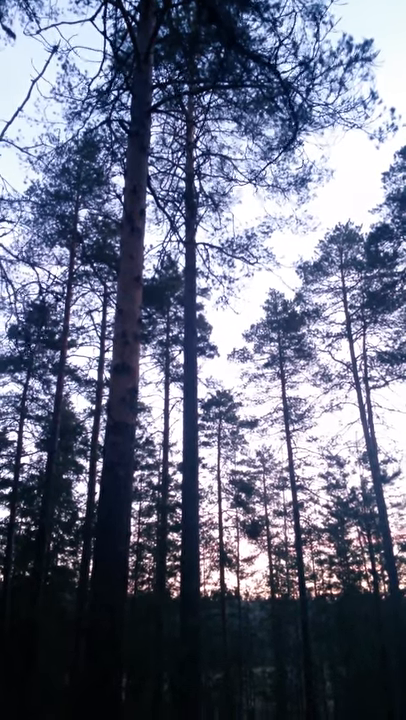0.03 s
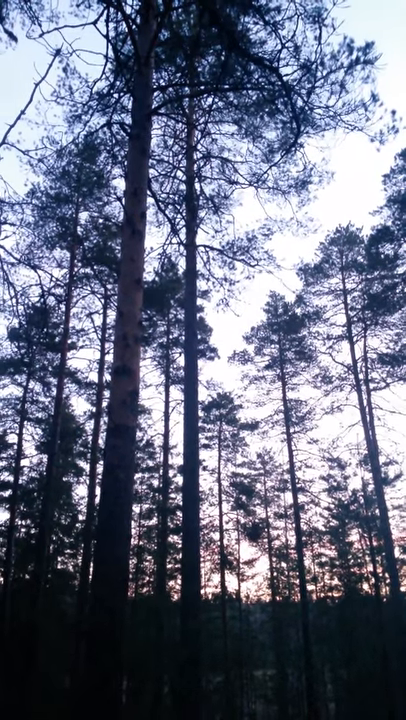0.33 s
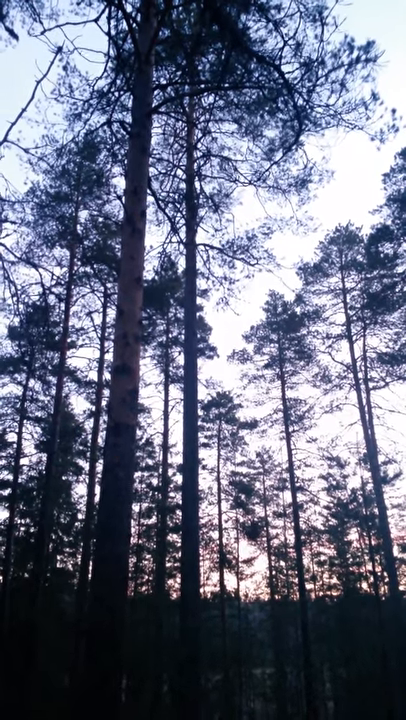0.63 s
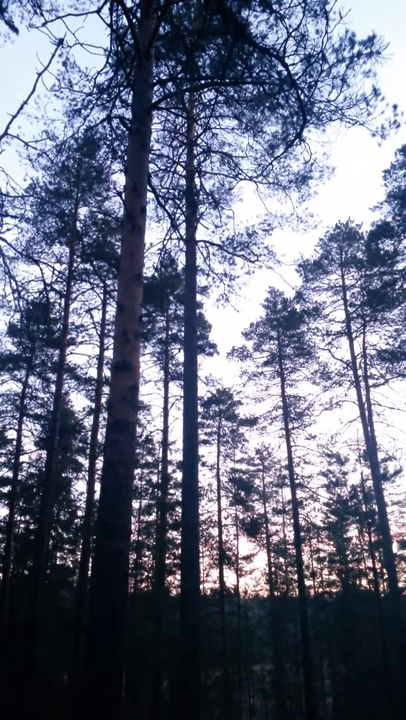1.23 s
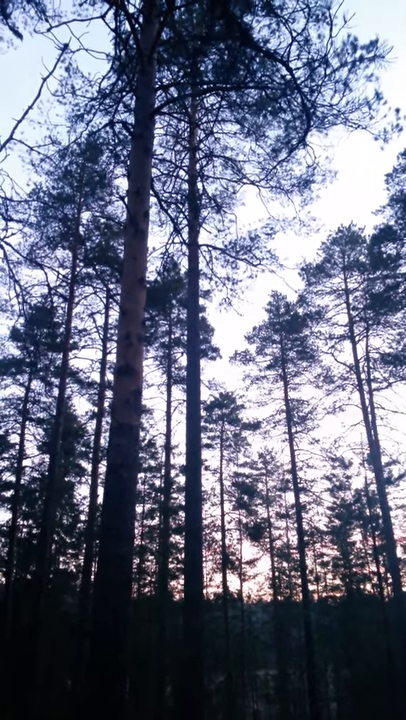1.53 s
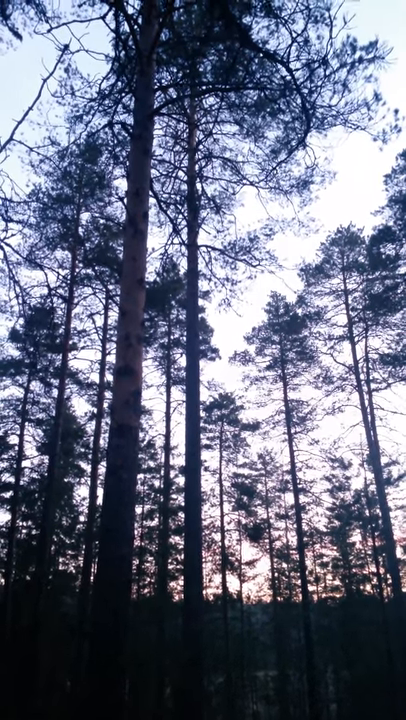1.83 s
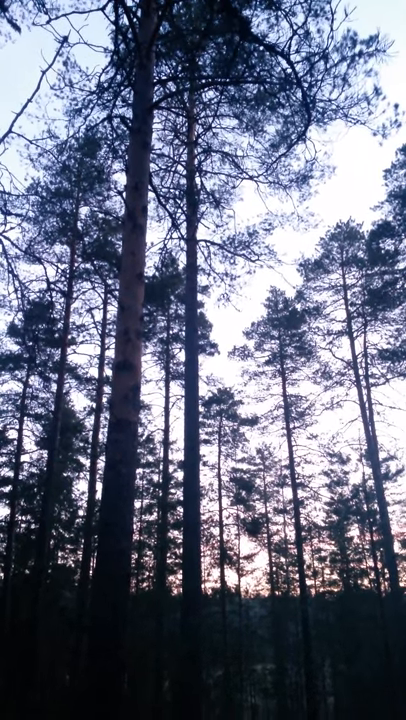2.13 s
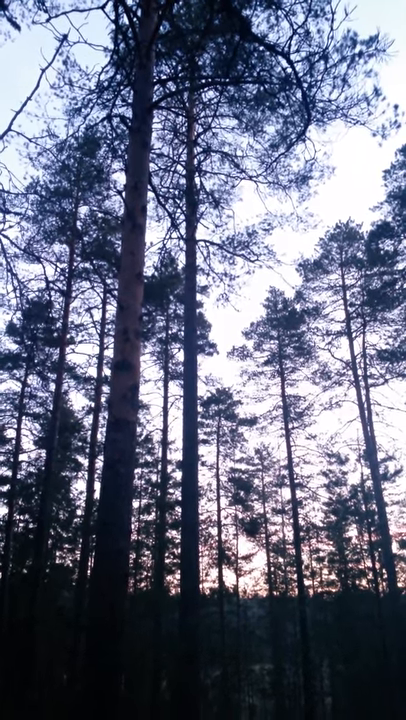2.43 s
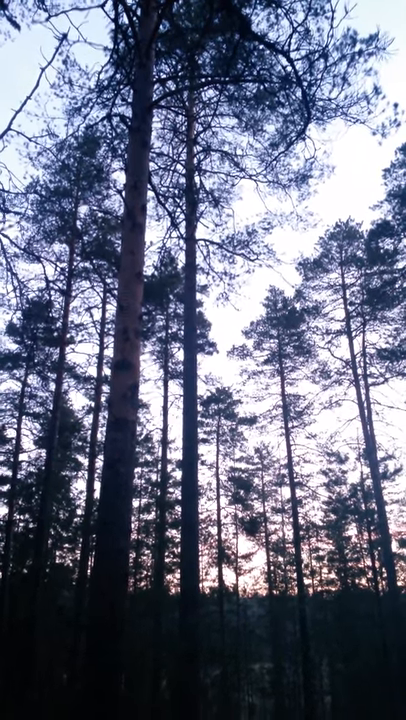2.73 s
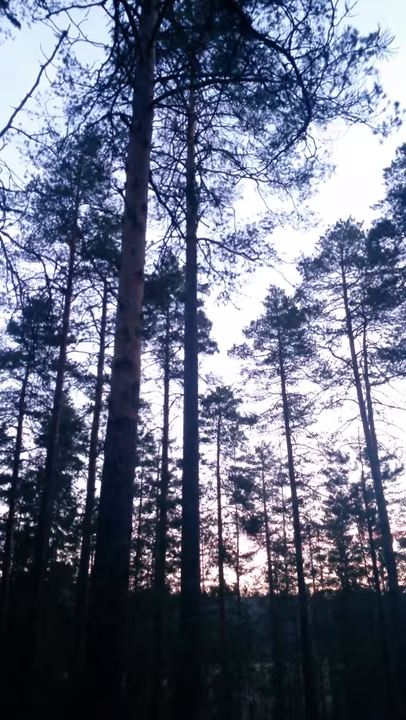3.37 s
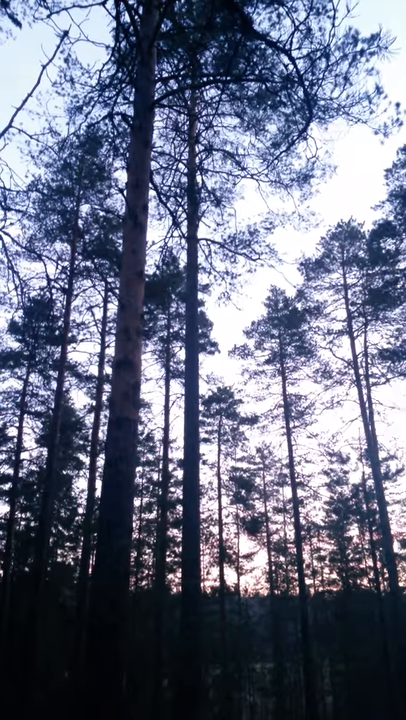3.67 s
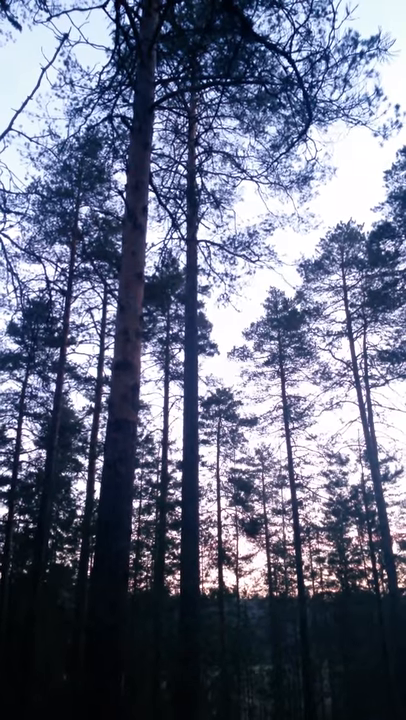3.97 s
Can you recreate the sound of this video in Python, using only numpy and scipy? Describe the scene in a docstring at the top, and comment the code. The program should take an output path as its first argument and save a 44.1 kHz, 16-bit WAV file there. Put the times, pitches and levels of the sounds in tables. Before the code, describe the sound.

A distant cuckoo, off to the right in a still forest, opens with one low note. Full high-then-low calls follow at about 1.2 and 2.9 seconds, each echoing among the trees while a soft hiss swells and sinks with it. Very faint songbirds whistle behind, resting around 2.2 seconds. Soft, dull bumps of a hand on the microphone come throughout, strongest near 3.3 seconds.

```python
"""A still pine forest, on a hand-held stereo recorder. It opens on the low, level note of a cuckoo far off
to the right, with very faint songbirds behind. At 1.2 s comes a full call: a high, falling note, then the
low one. The trunks throw the notes back and let them linger, and the recorder's noise suppressor opens
with each, so the hiss swells and sinks. The songbirds rest around 2.2 s, then return. At 2.9 s the cuckoo
calls again, while the hand, which bumps the recorder throughout, knocks hardest."""
import sys
import numpy as np
from scipy import signal
from scipy.fft import rfft, irfft
from scipy.io import wavfile
from scipy.ndimage import uniform_filter1d

SR = 44100
rng = np.random.default_rng(int(sys.argv[2]) if len(sys.argv) > 2 else 0)


def persist_wave(psi):
    """Save psi, clipped to +-1, as 16-bit WAV."""
    counts = np.round(np.clip(psi, -1, 1) * 32767).astype(np.int16)
    wavfile.write(sys.argv[1], SR, np.atleast_2d(counts).T)


N = 176400
T = np.arange(N) / SR


def from_db(db):
    """Decibels to gain."""
    return 10 ** (np.asarray(db) / 20)


def panned(x, pan_db):
    """Place a sound between the microphones at constant power; pan_db is left minus right."""
    gains = from_db([[pan_db / 2], [-pan_db / 2]])
    return x * gains / np.sqrt(np.mean(gains ** 2))


def delayed(x, delay_s):
    """The same sound, arriving later."""
    return np.interp(T - delay_s, T, x, left=0)


def band(x, low_hz, high_hz):
    """Gentle band-pass."""
    return signal.sosfilt(signal.butter(2, [low_hz, high_hz], "band", fs=SR, output="sos"), x)


def band_noise(low_hz, high_hz, size=N):
    """A band of noise at unit RMS."""
    noise = band(rng.standard_normal(size), low_hz, high_hz)
    return noise / noise.std()


def bell(centre_s, sigma_s):
    """A brief Gaussian swell."""
    return np.exp(-.5 * ((T - centre_s) / sigma_s) ** 2)


# Spectrum of the noise floor: frequency_hz, relative_db
AIR_SPECTRUM = [(15, -21), (28, -12), (50, -2.5), (100, -2.5), (160, -4.5), (320, -6), (550, -9.5),
                (1000, -12.5), (1600, -18), (3000, -21.5), (5000, -22.5), (10000, -23), (15500, -24)]

def air(level_db=-59.5, shared_power=0.05):
    """Steady forest air and microphone hiss, nearly unrelated left and right."""
    hz, db = np.transpose(AIR_SPECTRUM)
    bin_hz = np.arange(N // 2 + 1) * SR / N
    colour = from_db(np.interp(np.log(bin_hz + 1), np.log(hz), db))
    white = rng.standard_normal((3, N))
    stereo = np.sqrt(1 - shared_power) * white[:2] + np.sqrt(shared_power) * white[2]
    noise = irfft(rfft(stereo) * colour, N)
    return from_db(level_db) * noise / noise.std()


def forest_tail(x, early_t60_s=0.33, late_t60_s=3.67, late_db=-4, build_up_s=0.04):
    """Scatter from countless trunks: a quick decay and a long faint tail, different at each microphone."""
    t = T[:2 * SR]
    decay = from_db(-60 * t / early_t60_s) + from_db(late_db - 60 * t / late_t60_s)
    decay *= 1 - np.exp(-(t / build_up_s) ** 2)
    response = rng.standard_normal((2, len(t))) * decay / np.sqrt(np.sum(decay ** 2))
    return signal.fftconvolve(x[None], response, axes=1)[:, :N]


# Distant songbirds' whistles: start_s, length_s, from_hz, to_hz, level_db
WHISTLE_GLIDES = [(0.013, 0.074, 3520, 3650, -74), (0.201, 0.094, 2450, 2660, -67.5),
                  (0.263, 0.17, 3020, 3234, -74), (0.462, 0.093, 3880, 3820, -74),
                  (1.088, 0.057, 1960, 2146, -69), (1.123, 0.21, 2670, 3030, -74.5),
                  (1.349, 0.13, 2130, 2260, -71.5), (1.516, .07, 2720, 2690, -74),
                  (3.002, 0.085, 3340, 3070, -74), (3.107, 0.19, 2680, 2550, -77),
                  (3.38, 0.12, 3240, 3380, -74), (3.434, 0.137, 3650, 3860, -73.5)]
# The farthest birds, merged into a wash: time_s, level_db
CHORUS_LEVELS = [(0, -67.5), (.35, -69.5), (.7, -67.5), (1.2, -71.5), (1.6, -75), (2.2, -93), (2.8, -77),
                 (3.05, -72), (3.5, -69.5), (4, -77)]

def songbirds(warble_rms_hz=44.8, warble_s=0.0081, tail_db=-4.5):
    """Short warbling glides, blurred by distance, over the wash of birds still farther off."""
    warble = uniform_filter1d(rng.standard_normal(N), size=int(warble_s * SR))
    warble_hz = warble_rms_hz * warble / warble.std()
    whistles = np.zeros(N)
    for start_s, length_s, from_hz, to_hz, level_db in WHISTLE_GLIDES:
        progress = np.clip((T - start_s) / length_s, 0, 1)
        pitch_hz = from_hz + (to_hz - from_hz) * progress + warble_hz
        phase = 2 * np.pi * np.cumsum(pitch_hz) / SR
        whistles += from_db(level_db) * np.sin(np.pi * progress) * np.sin(phase)
    wash_db = np.interp(T, *np.transpose(CHORUS_LEVELS))
    wash = from_db(wash_db) * band_noise(1760, 4010, size=(2, N))
    return whistles + from_db(tail_db) * forest_tail(whistles) + wash


# Soft bumps of the hand on the recorder: time_s, peak_db, pitch_hz
HAND_BUMPS = [(0.204, -51.5, 80), (.935, -59, 87), (1.653, -48, 89), (2.255, -47, 76.4), (2.613, -48.5, 83),
              (2.768, -46, 64), (3.233, -47, 94), (3.279, -41.5, 73), (3.304, -46, 95), (3.433, -52, 112),
              (3.612, -46, 77), (3.757, -51, 85), (3.937, -50, 80)]
# Tiny ticks close to the microphones: time_s, level_db, low_hz, high_hz, pan_db
CLOSE_TICKS = [(0.482, -62.5, 4030, 6300, 3), (2.615, -59, 3920, 4900, 9), (2.784, -56, 6300, 9100, -21)]

def handling(grip_db=-73.5):
    """Dull bumps over the rumble of the grip, mostly on the right microphone, and a few ticks."""
    bumps = np.zeros(N)
    for time_s, peak_db, pitch_hz in HAND_BUMPS:
        swing = np.cos(2 * np.pi * pitch_hz * (T - time_s))
        bumps += from_db(peak_db) * bell(time_s, sigma_s=0.0053) * swing
    grip = from_db(grip_db) * band_noise(34.5, 88)
    out = panned(bumps + grip, pan_db=-18.5)
    for time_s, level_db, low_hz, high_hz, pan_db in CLOSE_TICKS:
        tick = from_db(level_db) * band_noise(low_hz, high_hz) * bell(time_s, sigma_s=0.002)
        out += panned(tick, pan_db)
    return out


# Reflections of the high note off the trees: delay_s, level_db, pan_db
HIGH_NOTE_ECHOES = [(.066, -13, -6), (.13, -20, -7)]
# Further reflections, mostly fainter, that return both notes: delay_s, level_db, pan_db
BOTH_NOTE_ECHOES = [(.115, -23.5, -2), (.215, -28.5, -2.5), (.31, -23.5, -7), (.465, -27.5, -4)]

def trunk_echoes(high, low):
    """Single reflections off the trees: the first set returns only the high note, the second both notes."""
    out = np.zeros((2, N))
    for notes, trunks in [(high, HIGH_NOTE_ECHOES), (high + low, BOTH_NOTE_ECHOES)]:
        for delay_s, level_db, pan_db in trunks:
            out += panned(from_db(level_db) * delayed(notes, delay_s), pan_db)
    return out


def hoots(notes, contour, overtones=(), fade_s=0.005):
    """Almost pure tones that all follow one contour of pitch and level."""
    times_s, pitch_hz, relative_db = np.transpose(contour)
    out = np.zeros(N)
    for start_s, level_db, offset_hz in notes:
        t = T - start_s
        phase = 2 * np.pi * np.cumsum(np.interp(t, times_s, pitch_hz) + offset_hz) / SR
        tone = np.sin(phase) + sum(from_db(db) * np.sin(harmonic * phase) for harmonic, db in overtones)
        fade = np.clip(np.minimum(t - times_s[0], times_s[-1] - t) / fade_s + 1, 0, 1)
        out += tone * fade * from_db(level_db + np.interp(t, times_s, relative_db))
    return out


# The cuckoo's high and low notes: start_s, level_db, pitch_offset_hz
HIGH_HOOTS = [(1.189, -34, 0.015), (2.888, -34.5, 0.97)]
LOW_HOOTS = [(-.04, -35.5, 0.21), (1.58, -35.5, 0), (3.28, -35, 1.48)]
# Course of each kind of note: time_in_note_s, pitch_hz, relative_db
HIGH_CONTOUR = [(0, 495.4, -19), (0.013, 581, -8), (.021, 617, 0.5), (0.051, 632, 0.7), (.083, 603, -0.5),
                (.102, 577.6, -6.5), (.125, 540, -5), (.14, 515.6, -10.5), (.155, 490, -31)]
LOW_CONTOUR = [(0, 480, -34), (.014, 503, -6.5), (.035, 519.5, 1.25), (.11, 513.7, 0), (.16, 512.8, -1.5),
               (0.195, 505.5, -6.5), (0.22, 475, -18.5)]
# Faint overtone of the high note: harmonic_number, relative_db
HIGH_OVERTONES = [(2, -42)]

def cuckoo(left_lag_s=0.00015, high_tail_db=-19, low_tail_db=-22.5):
    """Hoots from far right reach the left microphone a little late; echoes and the forest's tail follow."""
    high = hoots(HIGH_HOOTS, HIGH_CONTOUR, HIGH_OVERTONES)
    low = hoots(LOW_HOOTS, LOW_CONTOUR)
    direct = panned(high, pan_db=-6.5) + panned(low, pan_db=-12)
    left, right = direct + trunk_echoes(high, low)
    tail = forest_tail(from_db(high_tail_db) * high + from_db(low_tail_db) * low)
    return np.array([delayed(left, left_lag_s), right]) + panned(tail, pan_db=-2)


def scene():
    """Everything that reaches the microphones."""
    return cuckoo() + songbirds() + handling() + air()


def noise_suppressor(x, shut_db=-67.5, open_db=-44, depth_db=9.5, response_s=0.065, open_at_start=0.59):
    """The recorder turns everything down while the midrange is quiet and opens slowly when it is loud."""
    midrange = band(x, 450, 2400)
    power = uniform_filter1d(np.mean(midrange ** 2, axis=0), size=882)  # 20 ms
    level_db = 10 * np.log10(np.abs(power) + 1e-18)
    target = np.clip((level_db - shut_db) / (open_db - shut_db), 0, 1)
    pole = np.exp(-1 / (response_s * SR))
    opening, _ = signal.lfilter([1 - pole], [1, -pole], target, zi=[open_at_start])
    return x * from_db(depth_db * (opening - 1))


def record(dry):
    """Inside the recorder: the noise suppressor, then a steep cut above 15.6 kHz."""
    low_pass = signal.ellip(12, .1, 70, 15600, fs=SR, output="sos")
    return signal.sosfilt(low_pass, noise_suppressor(dry))


dry = scene()
out = record(dry)
persist_wave(out)
```